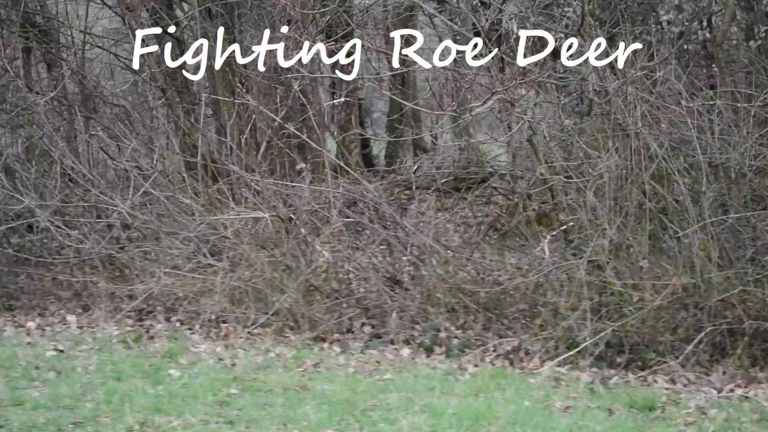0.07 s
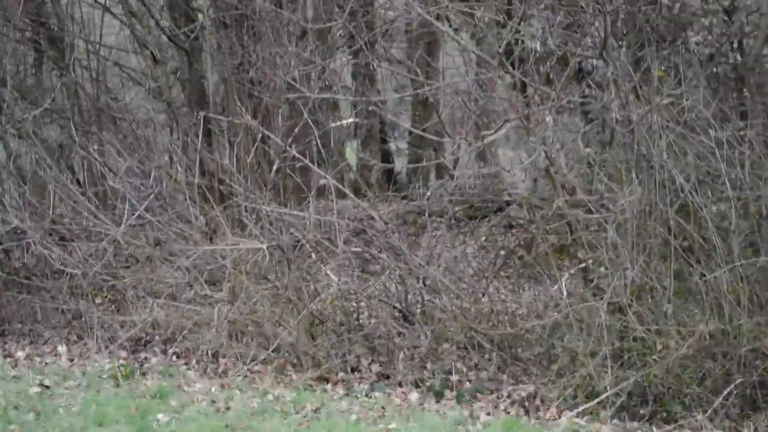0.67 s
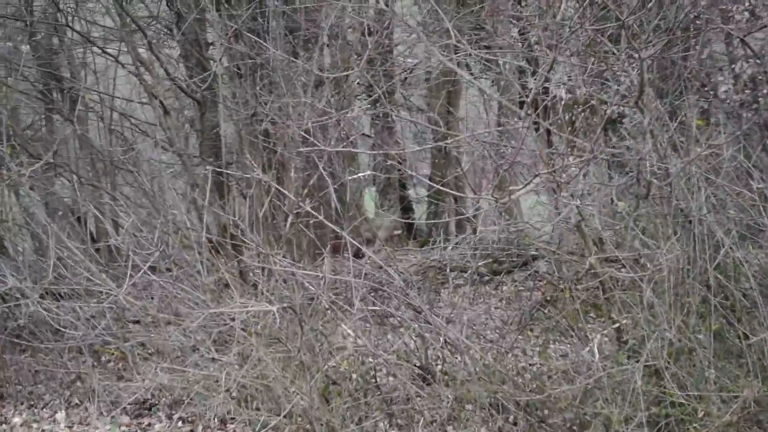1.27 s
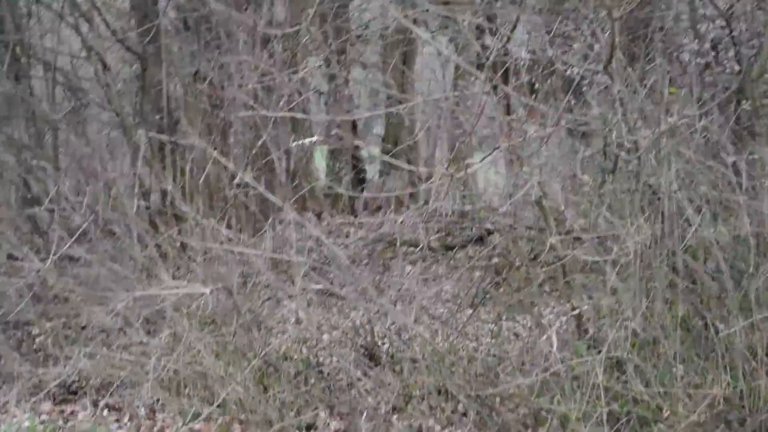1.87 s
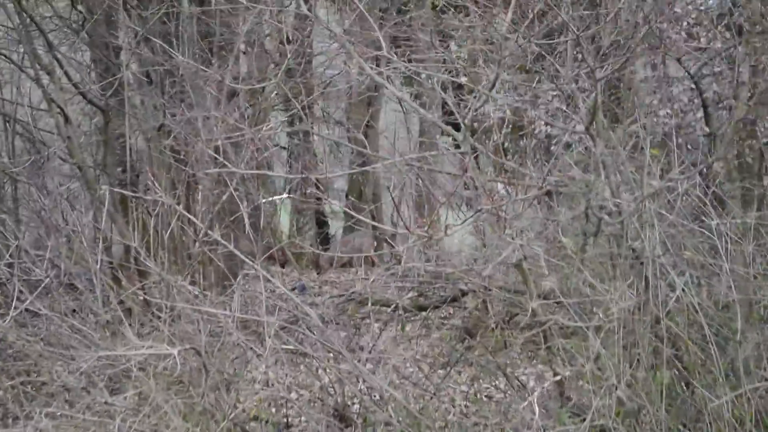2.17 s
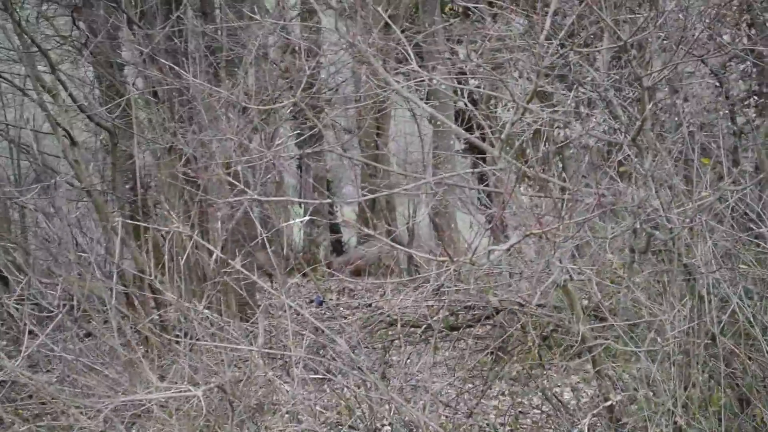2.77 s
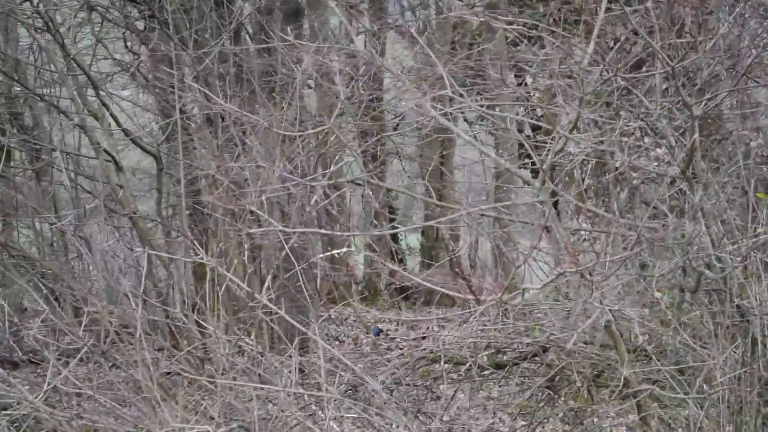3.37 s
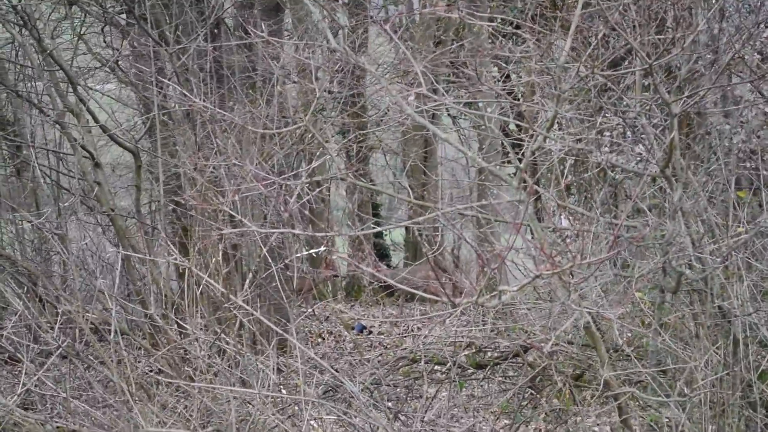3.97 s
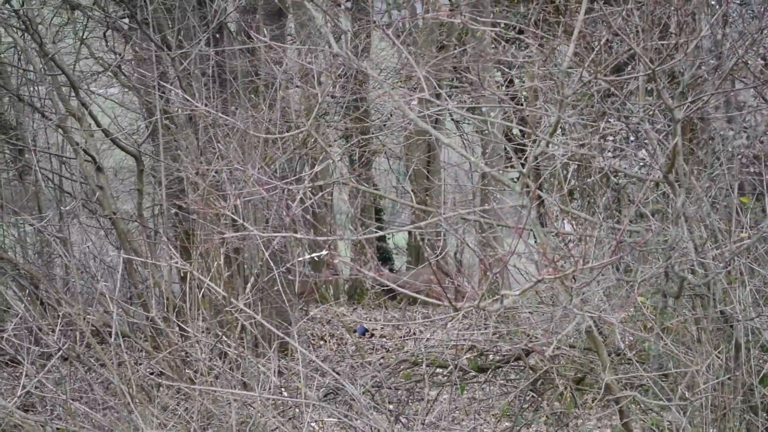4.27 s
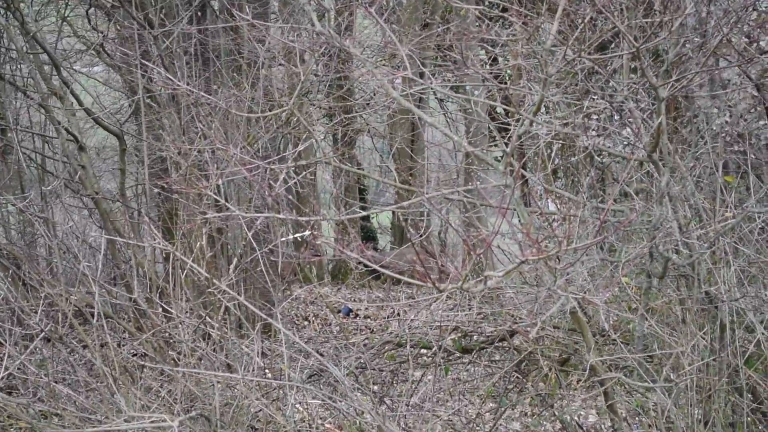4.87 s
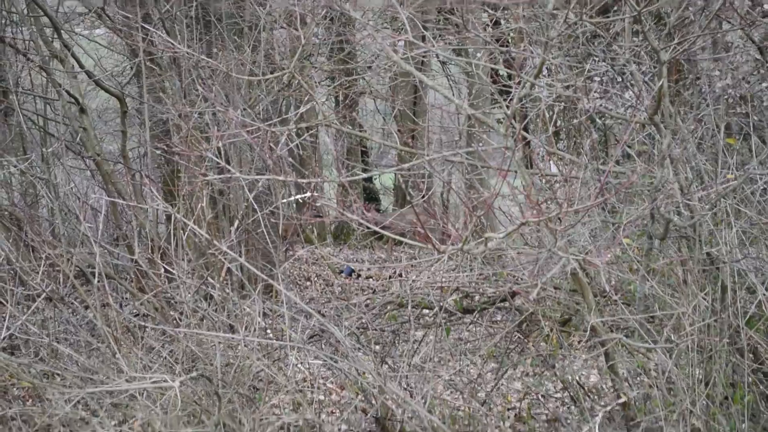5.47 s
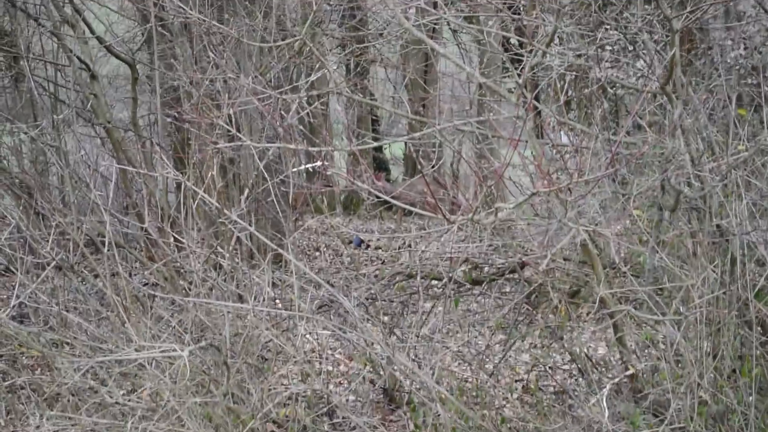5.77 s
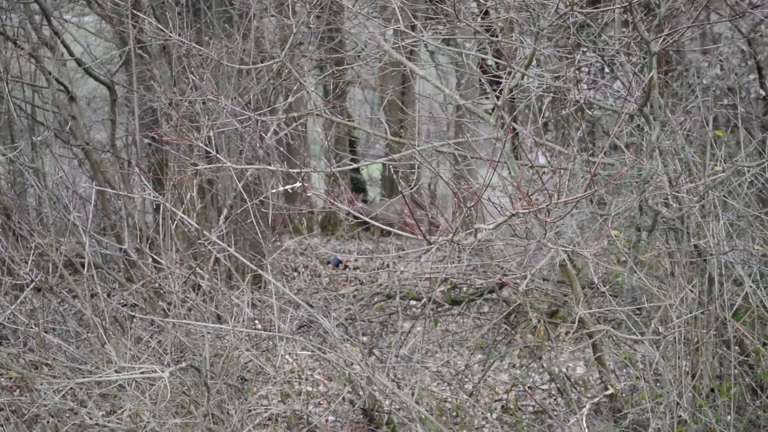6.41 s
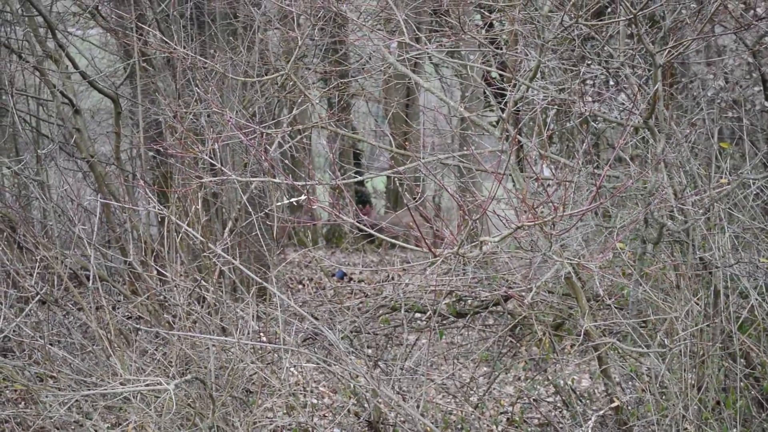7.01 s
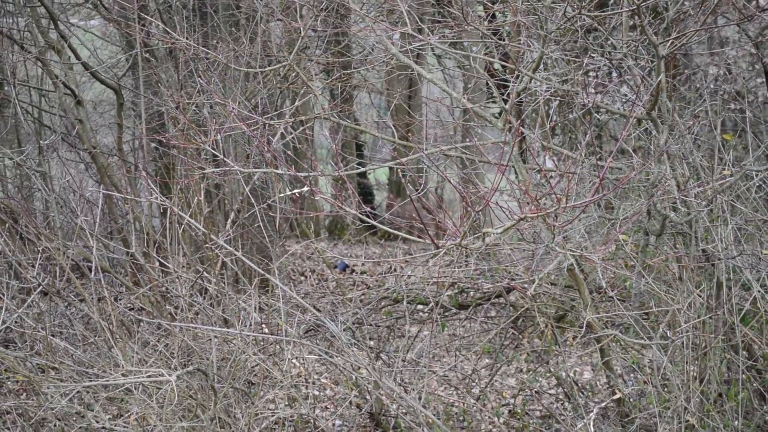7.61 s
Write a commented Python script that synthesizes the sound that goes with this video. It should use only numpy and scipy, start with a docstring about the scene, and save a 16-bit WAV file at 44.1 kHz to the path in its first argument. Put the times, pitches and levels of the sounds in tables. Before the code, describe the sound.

Wind hits a handheld camera's microphone in woodland from about 0.2 seconds, rumbling in gusts with hard pops until nearly 3 seconds. Up close, the lens motor whirrs, clicks and scrapes in three short runs before 0.8 seconds. A sleeve rustles between 1 and 2 seconds, ending in dry ticks and one short hollow plink at 1.9. Faint birds whistle and chirp among the trees until about 3.2 seconds. The wind then drops to light, low puffs. Tyres pass softly on a distant road, mostly between 3.5 and 5 seconds, while a faint far engine drones, falling in pitch around 6. From 5.6 to 6.5 seconds fingers snap and bump the plastic case and the lens motor makes four more clicking, slightly squeaky runs, with thin, high bird whistles behind. One more snap comes at 6.8, then soft rustling and wind puffs until about 7.6.

```python
"""Wind buffets the microphone of a handheld camera at the edge of a wood: gusts rumble and shed eddies
across the port, then drop to light puffs. The lens motor whirrs in short runs, its clicks and scrapes
ringing the plastic housing; a sleeve rustles, fingers knock the case and one hollow plink sounds.
Behind them birds whistle among the trunks, tyres pass on a distant road and a far engine drones."""
import sys
import numpy as np
from scipy import signal
from scipy.fft import rfft, irfft
from scipy.io import wavfile
from scipy.ndimage import uniform_filter1d

SR = 44100
rng = np.random.default_rng(int(sys.argv[2]) if len(sys.argv) > 2 else 0)


def store_pcm(level_fs):
    """Save levels as 16-bit WAV."""
    pcm = np.round(np.clip(level_fs, -1, 1) * 32767).astype(np.int16)
    wavfile.write(sys.argv[1], SR, np.atleast_2d(pcm).T)


N = 337365
T = np.arange(N) / SR
FREQ = np.fft.rfftfreq(N, 1 / SR)


def undb(db):
    """Decibels to gain."""
    return 10 ** (np.asarray(db) / 20)


def unit(x):
    """Scale to rms 1."""
    return x / np.sqrt(np.mean(x ** 2) + 1e-20)


def colour(x, points):
    """EQ through (f/Hz, level/dB) points joined on a log-frequency axis."""
    hz, db = np.transpose(points)
    return irfft(rfft(x) * undb(np.interp(np.log(FREQ + 1), np.log(hz), db)), N)


def noise(points):
    """Coloured noise of rms 1."""
    return unit(colour(rng.standard_normal(N), points))


def walk(rate):
    """Random modulation with about rate turns a second, rms 1."""
    return unit(np.interp(T * rate, np.arange(8000), rng.standard_normal(8000)))


def sine(hz):
    """A sine that follows a pitch track."""
    return np.sin(2 * np.pi * np.cumsum(hz) / SR)


def swell(s, half_s):
    """A smooth rise and fall around time s."""
    return np.exp(-np.minimum(((T - s) / half_s) ** 2, 60))


def add(out, s, sound):
    """Mix a short sound in at time s."""
    i = max(int(s * SR), 0)
    out[i:i + len(sound)] += sound[:N - i]


def contacts(rows, decay_ms):
    """A burst of dying noise for each (t/s, level/dB) row; 0 dB has the energy of 1 ms at level 1."""
    envelope = np.exp(-T[:SR // 20] * 1000 / decay_ms)
    envelope *= np.sqrt(SR / 1000 / np.sum(envelope ** 2))
    out = np.zeros(N)
    for s, db in rows:
        add(out, s, undb(db) * rng.choice([-1, 1], len(envelope)) * envelope)
    return out


# spectrum of the woodland bed: f/Hz, level/dB
AIR_EQ = [(18, -26), (35, -6), (70, -4), (130, -5), (180, -2), (330, -12.5), (700, -8), (1030, -5),
          (1700, -14), (2130, -7.5), (2500, -17), (4600, -21.5), (5600, -22), (15000, -28.5)]

def background():
    """Still woodland air, with the thin whine of the camera's electronics."""
    air = noise(AIR_EQ) * undb(.5 * walk(5.6))
    whine = np.sin(2 * np.pi * 15681 * T)
    return undb(-49.5) * air + undb(-65.5) * whine


# pitch and fader curve of the engine: t/s, f/Hz, level/dB
ENGINE_CURVE = [(3.3, 103.8, -61), (3.71, 103.6, -57), (5.7, 107.1, -57.5), (5.99, 103.8, -53),
                (6.21, 82.6, -57.5), (7.65, 83.6, -62.5)]

def far_engine(fade_s=.27):
    """A far engine drones on a fundamental and its octave, then drops in pitch."""
    s, hz, db = np.transpose(ENGINE_CURVE)
    pitch = np.interp(T, s, hz) * (1 + .0064 * walk(11))
    drone = unit(sine(pitch) + sine(2 * pitch)) * undb(.42 * walk(6.7))
    outside_s = np.abs(T - np.clip(T, s[0], s[-1]))
    return drone * undb(np.interp(T, s, db) - .5) * np.exp(-outside_s / fade_s)


# spectra of road roar and tread hiss: f/Hz, level/dB
ROAR_EQ = [(300, -51.5), (600, -13.5), (800, -4), (980, 5), (1150, -3.5), (1400, -8), (1750, -24),
           (2130, -16.5), (2500, -40), (6000, -49)]
HISS_EQ = [(600, -48), (1300, 17), (1800, 5), (2130, 5), (2500, 0), (3100, 2), (4000, -21), (7000, -36),
           (12000, -50)]
# car passes: nearest t/s, half-length/s, roar level/dB, hiss level/dB
PASSES = [(3.3, 0.78, -51.5, -75), (3.95, 0.62, -44, -57), (4.92, 0.4, -43.5, -45.5),
          (6.4, 0.42, -52.5, -55.5)]

def cars(roar_falloff=1.8, hiss_falloff=1.13, hiss_lag_s=.092):
    """Tyres pass, hissing backwards; the trees make them fade faster than distance alone would."""
    roar_power, hiss_power = 0, 0
    for s, half_s, roar_db, hiss_db in PASSES:
        roar_power += undb(roar_db) ** 2 / (1 + ((T - s) / half_s) ** 2) ** roar_falloff
        hiss_power += undb(hiss_db) ** 2 / (1 + ((T - s - hiss_lag_s) / half_s) ** 2) ** hiss_falloff
    roar = noise(ROAR_EQ) * np.sqrt(roar_power)
    hiss = noise(HISS_EQ) * np.sqrt(hiss_power)
    return (roar + undb(-2.5) * hiss) * undb(.56 * walk(9.7))


def note(hz, quaver=.0073):
    """A whistled note along a pitch track, swelling and fading, with a slight quaver."""
    u = np.linspace(0, 1, len(hz))
    waver = np.interp(u, np.linspace(0, 1, 20), rng.standard_normal(20))
    return np.sqrt(2 * np.abs(np.sin(np.pi * u))) * sine(hz * (1 + quaver * waver))


# one swoop dips, slurs up and levels off: t/s into the call, f/Hz, level/dB
SWOOP_SHAPE = [(0, 2900, -3), (0.049, 2546, -2), (0.109, 2470, -0.5), (.14, 2944, -2), (.17, 3850, -1.5),
               (.195, 4270, -1), (.235, 4220, 1)]
# swoop cues: t/s, level/dB
SWOOP_CUES = [(1.025, -50), (1.527, -49), (2.084, -52)]
# arched chirps: t/s, top f/Hz, level/dB
CHIRP_CUES = [(.715, 4330, -49), (.87, 4180, -51), (1.07, 4280, -51), (2.43, 3940, -56), (2.73, 4260, -46),
              (2.925, 4160, -46), (3.125, 4150, -49)]
# plain whistles: t/s, length/s, f/Hz, glide/Hz, level/dB
WHISTLE_CUES = [(.56, 0.093, 2186, -150, -47), (0.635, 0.065, 2890, -1.5, -49),
                (1.633, 0.093, 1807, 2, -52), (1.9, 0.032, 2680, -200, -54),
                (1.951, 0.094, 1820, -170, -55), (2.234, 0.14, 2904, 192, -49.5),
                (2.636, 0.088, 2390, 70, -51.5), (5.72, 0.12, 7320, -480, -55), (5.92, .13, 7070, 100, -52),
                (6.11, .09, 7480, -300, -53)]

def birds(chirp_s=.084, arch_hz=820, t60=.28):
    """A repeated swoop, arched chirps and plain whistles, scattered by the trunks."""
    song = np.zeros(N)
    at, pitch, shape_db = np.transpose(SWOOP_SHAPE)
    t = T[T < at[-1]]
    for s, db in SWOOP_CUES:
        add(song, s, undb(db + np.interp(t, at, shape_db)) * note(np.interp(t, at, pitch)))
    sag = arch_hz * (T[T < chirp_s] / chirp_s - .58) ** 2  # the arch tops out just past halfway
    for s, hz, db in CHIRP_CUES:
        add(song, s, undb(db) * note(hz - sag))
    for s, length, hz, glide_hz, db in WHISTLE_CUES:
        add(song, s, undb(db) * note(hz + glide_hz * (T[T < length] / length - .5)))
    trunks = rng.standard_normal(SR) * np.exp(-np.log(1000) * T[:SR] / t60)
    reverb = signal.fftconvolve(song, trunks / np.linalg.norm(trunks))[:N]
    return undb(-5) * song + undb(-7.5) * reverb


def plink(s=1.941, hz=1040, t60=.034, db=-25):
    """One short hollow note, sagging a little as it dies."""
    t = T[:SR // 8]
    ring = sine(hz * (1 + .027 * np.exp(-t / .0032)))
    envelope = (1 - np.exp(-t / .00013)) * np.exp(-np.log(1000) * t / t60)
    out = np.zeros(N)
    add(out, s, undb(db) * ring * envelope)
    return out


# spectrum of rubbing cloth: f/Hz, level/dB
CLOTH_EQ = [(300, -4), (1250, -4.5), (1700, -4.5), (3000, -4), (5000, -2), (7500, -0.5), (9500, 3),
            (11500, -7), (15000, -21)]
# sleeve strokes: middle t/s, swell and fade time/s, level/dB
SLEEVE_STROKES = [(.16, .05, -51), (.66, 0.08, -50), (1.01, 0.13, -46), (1.36, 0.18, -44),
                  (1.5, 0.12, -44.5), (1.849, 0.1, -45), (2.32, 0.17, -59), (2.83, .1, -58.5),
                  (3.1, 0.19, -60), (3.431, 0.069, -47), (3.92, 0.06, -59), (4.28, .1, -62.5),
                  (4.51, .06, -53.5), (7.08, 0.033, -55), (7.52, 0.38, -56.5)]
# cloth ticks: t/s, level/dB
CLOTH_TICKS = [(1.8439, -27), (1.8528, -23), (2.273, -37), (3.097, -35), (3.1737, -39), (3.9234, -36),
               (6.7354, -37)]

def sleeve():
    """A sleeve brushes the camera in grainy strokes with a few dry ticks."""
    power = sum((undb(db) * np.exp(-np.abs(T - s) / fade)) ** 2 for s, fade, db in SLEEVE_STROKES)
    rustle = noise(CLOTH_EQ) * undb(.79 * walk(300)) * np.sqrt(power)
    ticks = colour(contacts(CLOTH_TICKS, decay_ms=2.1), CLOTH_EQ)
    return undb(2.5) * rustle + undb(-1.5) * ticks


# spectrum of a plastic snap: f/Hz, level/dB
SNAP_EQ = [(450, -18.5), (1000, -2.5), (1350, -4), (1950, -6), (2250, 0.5), (2550, -12), (4500, -22),
           (6000, -18), (8000, -25), (9700, -17), (13000, -42)]
# snaps and bumps, before EQ and make-up gain: t/s, level/dB
CASE_SNAPS = [(5.6137, -28), (5.7735, -24.5), (5.8157, -29), (6.8281, -26)]
CASE_BUMPS = [(3.237, -45), (5.816, -41.5), (6.022, -39), (6.248, -37)]

def fingers():
    """Fingers snap the plastic case and zoom lever, and bump the case with dull thuds."""
    snaps = colour(contacts(CASE_SNAPS, decay_ms=5.2), SNAP_EQ)
    bumps = contacts(CASE_BUMPS, decay_ms=12)
    thuds = colour(bumps, [(100, -14), (380, -1), (700, -8), (1500, -6), (4000, -25), (9000, -55)])
    return undb(14.5) * snaps + undb(24.5) * thuds


# resonances of the shell: f/Hz, width/Hz, level/dB
SHELL_MODES = [(1160, 370, -0.5), (2130, 420, 5.5), (2797, 100, 3), (2970, 34, 4.5), (3090, 72, 1.5),
               (3394, 275, 10), (4070, 320, 0), (4530, 130, 1), (5090, 84, 5.5), (5370, 120, 7),
               (5525, 390, 9.5), (5600, 170, 10), (5950, 99, -21), (6870, 180, -0.5), (7810, 320, 5),
               (9100, 170, -41), (9600, 500, -20)]

def housing(x, top_hz=10500):
    """Ring the camera's plastic shell, which damps the highest treble; white noise keeps its level."""
    response = sum(undb(db) * 1j * FREQ * width / (hz ** 2 - FREQ ** 2 + 1j * FREQ * width)
                   for hz, width, db in SHELL_MODES)
    damping = 1 / np.sqrt(1 + (FREQ / top_hz) ** 10)
    return irfft(rfft(x) * unit(np.abs(response) * damping), N)


def gear_clicks(clicks):
    """Each click is a short blow with a bright edge and a weaker rattle of loose gears."""
    blows = [(s, db) for s, db, _ in clicks]
    knocks = contacts(blows, decay_ms=1.65) + undb(-8) * contacts(blows, decay_ms=4.8)
    knocks = colour(knocks, [(1000, -1), (2800, -3), (5600, -1), (8000, -9), (12000, -17)])
    edges = contacts([(s, db + edge_db) for s, db, edge_db in clicks], decay_ms=1.3)
    edges = colour(edges, [(4000, -31.5), (7500, -6), (10000, -6), (15000, -18)])
    return housing(undb(-2.5) * knocks + undb(24) * edges)


# spectrum of the friction that drives the shell: f/Hz, level/dB
FRICTION_EQ = [(300, -20), (1200, 2), (2200, -1.5), (3000, 3), (3500, 3.5), (4400, -4.5), (5500, -9),
               (12000, -11)]
# barrel scrapes: middle t/s, half-length/s, level/dB
BARREL_SCRAPES = [(.312, 0.094, -37), (.52, .018, -32.5), (5.81, 0.012, -36), (6.07, .064, -37),
                  (6.242, 0.013, -32), (6.274, 0.01, -32.5)]

def lens_barrel(gear_scrapes, squeak_hz=3247, climb=.09, hard_press_db=-31):
    """The barrel sticks and slips in its guide, so a wandering squeak climbs through each scrape."""
    scrapes = BARREL_SCRAPES + gear_scrapes
    presses = [undb(db) * swell(s, half) for s, half, db in scrapes]
    pressure = sum(presses)
    progress = sum(p * np.tanh((T - s) / half) for p, (s, half, _) in zip(presses, scrapes)) / pressure
    pitch = squeak_hz * (1 + climb * progress + .032 * walk(45) + .027 * walk(500))
    grip = undb(2.5 * walk(250))
    rasp = unit(housing(noise(FRICTION_EQ) * grip))
    # the squeak grows with the square of the pressure
    squeak = unit(sine(pitch) * grip) * pressure ** 2 / undb(hard_press_db)
    return undb(-1) * pressure * rasp + undb(-4) * squeak


# spectrum of the motor that drives the shell: f/Hz, level/dB
MOTOR_EQ = [(300, -2), (1200, -11), (3300, 7), (5600, 6), (8000, 0), (11000, -1.5), (15000, -27)]
# motor runs: start t/s, stop t/s, whirr level/dB, gear click level/dB
MOTOR_RUNS = [(.2052, .4075, -44, -18.5), (0.4512, .633, -41, -15.5), (0.707, 0.806, -46.5, -19),
              (5.7548, 5.906, -42.5, -17), (5.9625, 6.165, -42.5, -19.5), (6.2083, 6.384, -41.5, -34),
              (6.4228, 6.5295, -44, -16)]

def lens_motor(slack_s=.022, touch_s=.0038):
    """The motor ticks, takes up its slack, engages with a double click, whirrs and stops with a knock."""
    running, clicks, scrapes = 0, [], []
    for start, stop, whirr_db, click_db in MOTOR_RUNS:
        running += undb(whirr_db) * np.clip((T - start) / .011, 0, 1) * np.clip((stop - T) / .0021, 0, 1)
        engage = start + slack_s
        touch = engage - touch_s  # the teeth touch softly before they snap home
        # t/s, level/dB, edge offset/dB
        clicks += [(start, -34, -14), (touch, click_db - 1.5, -27),
                   (engage, click_db, -18), (stop, -19, -28)]
        scrapes.append((touch, .0087, click_db - 18))  # the barrel scrapes as the gears take hold
    whirr = unit(housing(noise(MOTOR_EQ) * undb(1.2 * walk(700))))
    return running * whirr + lens_barrel(scrapes) + gear_clicks(clicks)


# gusts at the microphone: t/s, hold/s, level/dB
GUST_CUES = [(0.221, 0.014, -21.5), (.26, .35, -26.5), (0.677, 0.039, -15.5), (0.785, 0.11, -20.5),
             (1.011, 0.13, -23), (1.103, 0.37, -18), (1.515, 0.12, -19.5), (2.048, 0.34, -22),
             (2.542, 0.19, -32), (2.752, 0.082, -26.5)]
# light puffs once the wind has dropped: t/s, level/dB
PUFF_CUES = [(3.04, -40.5), (3.24, -36.5), (3.35, -36.5), (3.43, -43), (3.79, -44), (4.07, -37.5),
             (4.3, -38), (4.454, -35.5), (4.55, -45), (4.935, -41), (5.099, -49), (6.06, -46),
             (6.31, -41.5), (6.92, -46.5), (7.07, -39.5), (7.21, -35), (7.4, -43), (7.51, -36)]

def wind_strength(rise_db_per_s=159, fall_db_per_s=101, calm_db=-57.5, puff_half_s=.033):
    """Each gust builds, holds and dies away; short puffs stir the calm that follows."""
    puff_power = sum((undb(db) * swell(s, puff_half_s)) ** 2 for s, db in PUFF_CUES)
    gusts_db = [db - rise_db_per_s * np.maximum(s - T, 0) - fall_db_per_s * np.maximum(T - s - hold, 0)
                for s, hold, db in GUST_CUES]
    return np.sqrt(undb(calm_db) ** 2 + puff_power + undb(np.max(gusts_db, axis=0)) ** 2)


# swells of the port's song: middle t/s, half-length/s, level/dB
PORT_SWELLS = [(1.33, 0.31, -52.5), (2.25, 0.26, -50.5)]

def port_song():
    """The microphone port sings faintly in two long gusts."""
    breath = noise([(900, -28), (1250, 6), (1600, -6), (2100, -8), (3500, -9), (8000, -47)])
    return breath * sum(undb(db) * swell(s, half) for s, half, db in PORT_SWELLS)


def eddy(half_width_ms):
    """Pressure of one vortex crossing the port: a cusp with slow flanks, centred in 60 ms."""
    u = np.arange(-30, 30, 1000 / SR) / half_width_ms
    cusp = np.real(np.exp(2j * np.pi * rng.random()) / (1 - 1j * u) ** 2)
    return cusp * np.hanning(len(u))


def eddy_swarm(strength, growth=1.7, strong_gust_db=-19.5):
    """Gusts shed small eddies, which grow as a power of the wind's strength."""
    swarm = 0
    for half_width_ms, per_s, db in [(1.376, 190, 2.5), (.69, 170, -11.5)]:
        kicks = (rng.random(N) < per_s / SR) * rng.uniform(-.62, 1, N)
        swarm += undb(db) * unit(signal.fftconvolve(kicks, eddy(half_width_ms), "same"))
    swarm = colour(swarm, [(30, -24), (80, -30), (170, 2.5)])  # small eddies carry little deep bass
    return undb(-30) * (strength / undb(strong_gust_db)) ** growth * swarm


# the hardest buffets: t/s, level/dB, half-width/ms
BUFFET_HITS = [(.220, -13, 2.4), (.264, -14, 1.3), (.32, -21, 1.2), (.374, -19, 2.2), (.561, -17, 1.6),
               (.681, -21, .6), (.699, -6, .9), (.811, -13, 1.1), (.850, -16.5, .95), (.872, -17, .9),
               (.917, -16, .85), (1.176, -15, .7), (1.397, -13, .9), (1.431, -13, 1.1), (1.572, -18, .85),
               (1.635, -7.5, .9), (2.093, -14, 1), (2.199, -14, 1.2), (2.253, -17, 1), (2.39, -19, 1.4),
               (2.487, -25, 1.1), (2.8, -20, 1.5)]

def buffets(boost_db=6):
    """Single vortices hit the port as hard pops."""
    out = np.zeros(N)
    for s, db, half_width_ms in BUFFET_HITS:
        pulse = eddy(half_width_ms)
        add(out, s - len(pulse) / 2 / SR, undb(db + boost_db) * pulse)
    return out


# rumble spectra of light air and of fast air: f/Hz, level/dB
LIGHT_WIND_EQ = [(15, -13), (35, -5), (65, -0.5), (110, -8), (180, -30.5), (400, -34), (1000, -68)]
FAST_WIND_EQ = [(25, -57), (60, -7.5), (100, 1.5), (150, -3), (230, -11.5), (400, -39), (800, -37),
                (2000, -74)]

def wind(crossfade_db=-31):
    """Light air only rumbles deeply; strong gusts rumble higher, with eddies, buffets and port song."""
    strength = wind_strength()
    fast_share = 1 / (1 + (undb(crossfade_db) / strength) ** 2)
    rumble = np.sqrt(1 - fast_share) * noise(LIGHT_WIND_EQ) + np.sqrt(fast_share) * noise(FAST_WIND_EQ)
    rumble *= undb(5.4 * walk(45))  # turbulence comes in lumps
    rumble /= np.sqrt(uniform_filter1d(rumble ** 2, SR // 12))  # strength alone sets the slower level
    return undb(-.5) * strength * rumble + eddy_swarm(strength) + buffets() + port_song()


def scene():
    """Close and distant sources mixed in mono at the one microphone."""
    close = wind() + lens_motor() + sleeve() + fingers() + plink()
    distant = birds() + cars() + far_engine() + background()
    return (close + distant)[None]


def record(dry, start_s=.155, top_hz=15950):
    """The sound switches on a moment in; a steep low-pass cuts the top."""
    gate = np.clip((T - start_s) / .00038, 0, 1)
    return signal.sosfilt(signal.ellip(12, .1, 80, top_hz, fs=SR, output="sos"), dry * gate)


dry = scene()
out = record(dry)
store_pcm(out)
```